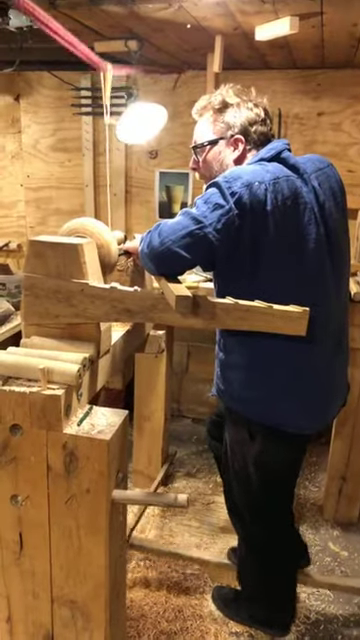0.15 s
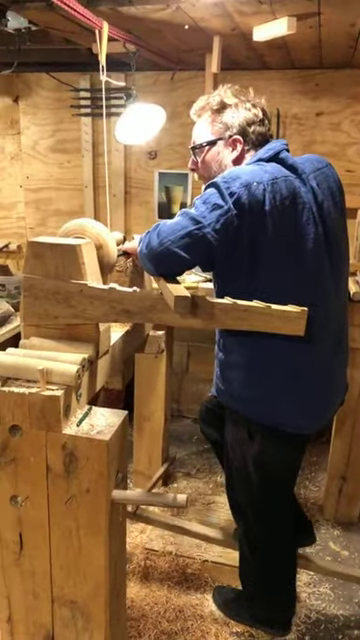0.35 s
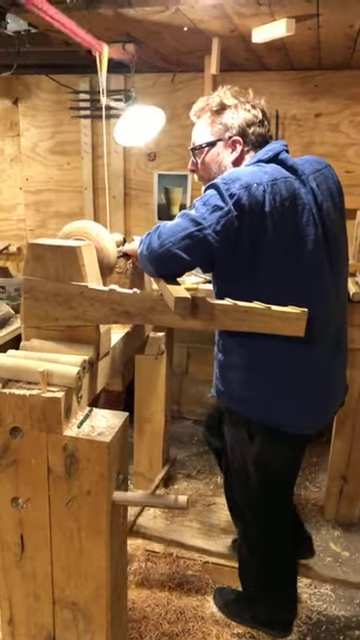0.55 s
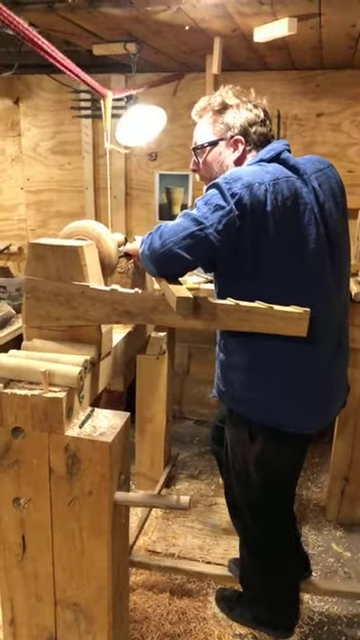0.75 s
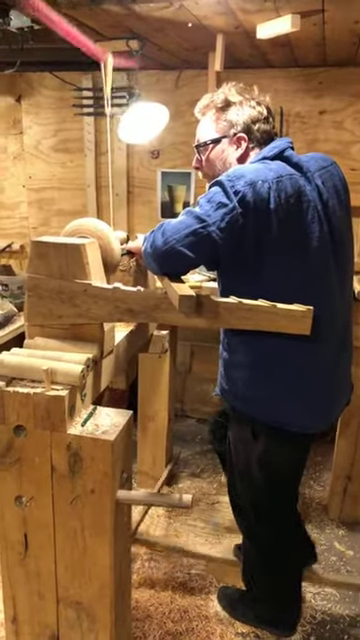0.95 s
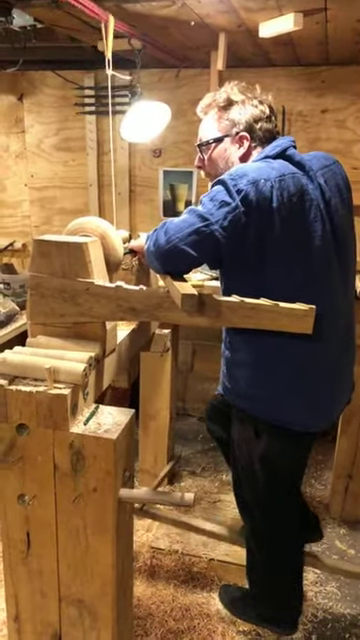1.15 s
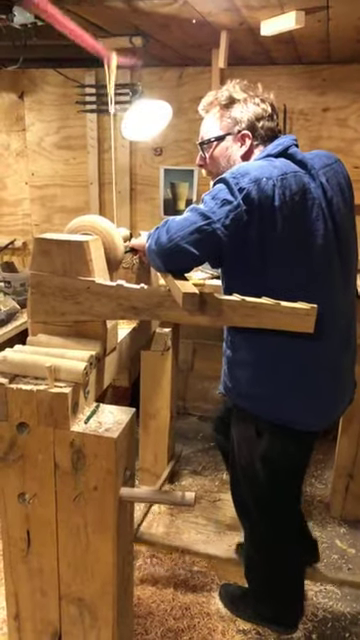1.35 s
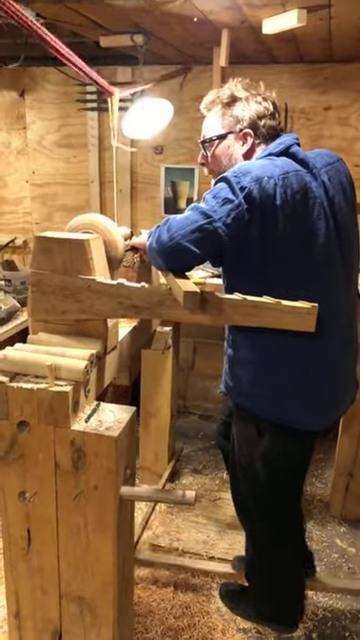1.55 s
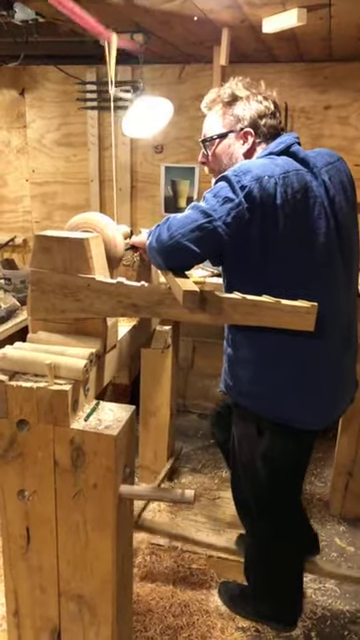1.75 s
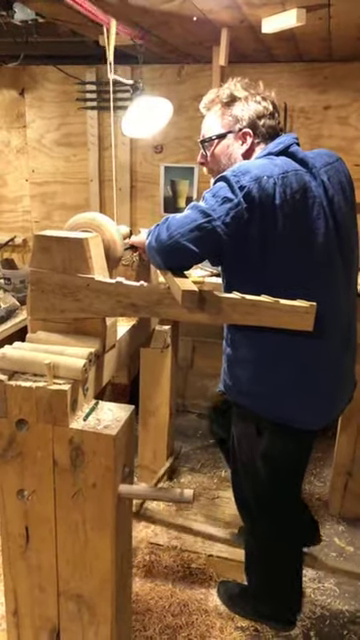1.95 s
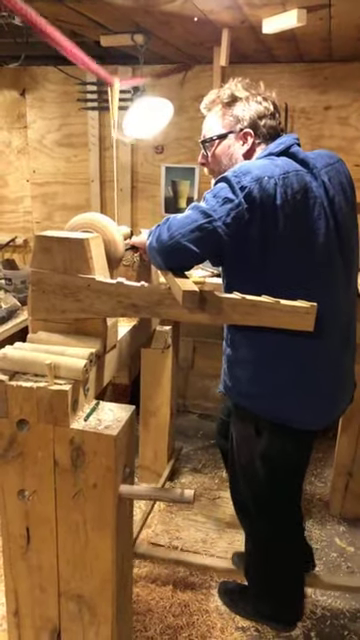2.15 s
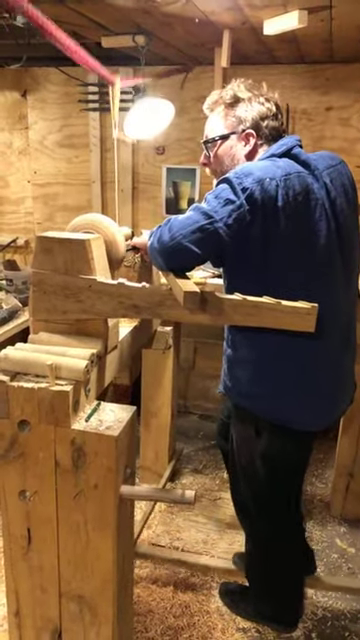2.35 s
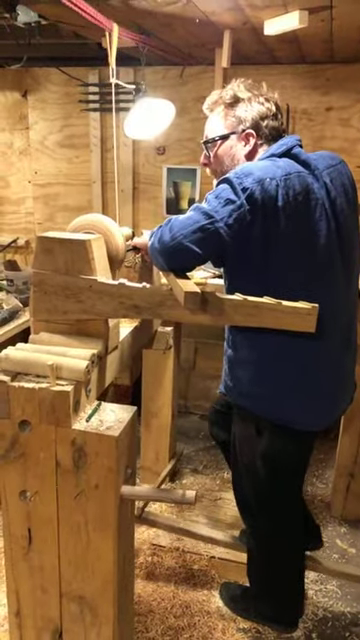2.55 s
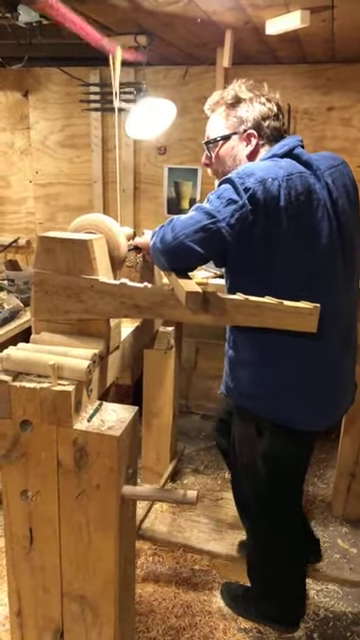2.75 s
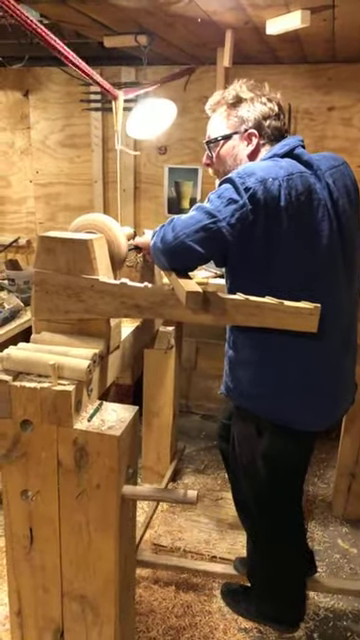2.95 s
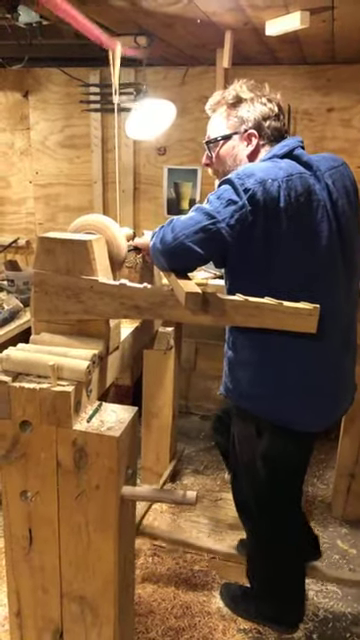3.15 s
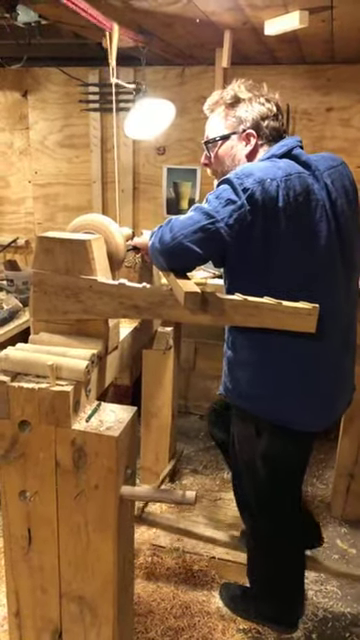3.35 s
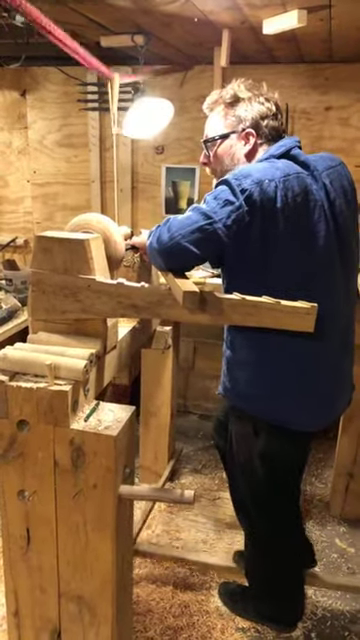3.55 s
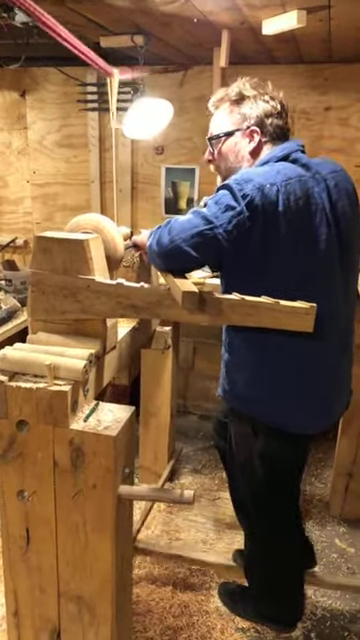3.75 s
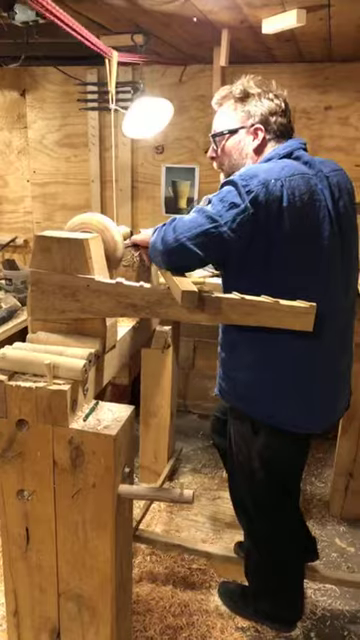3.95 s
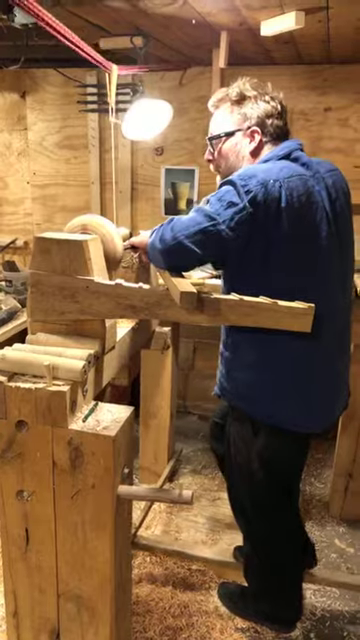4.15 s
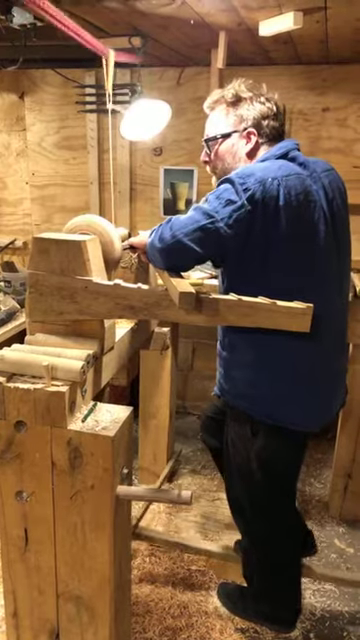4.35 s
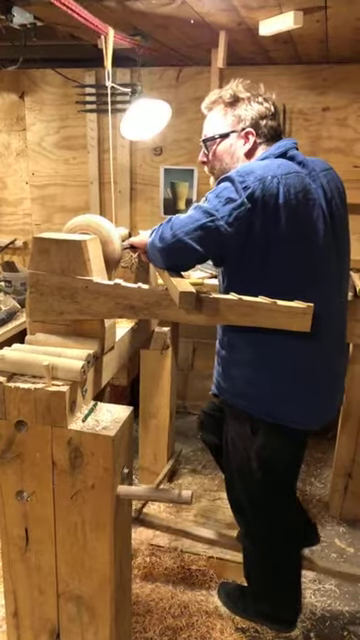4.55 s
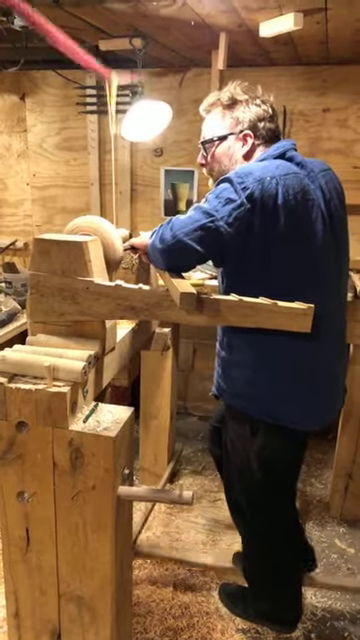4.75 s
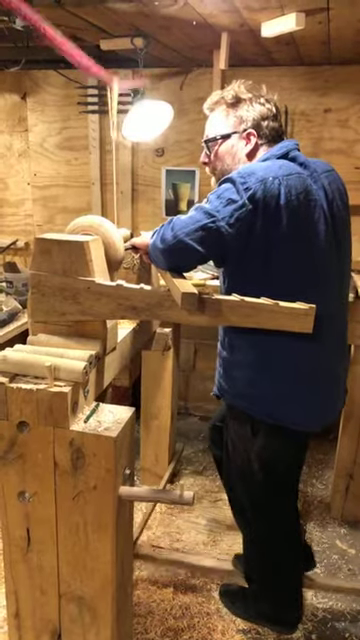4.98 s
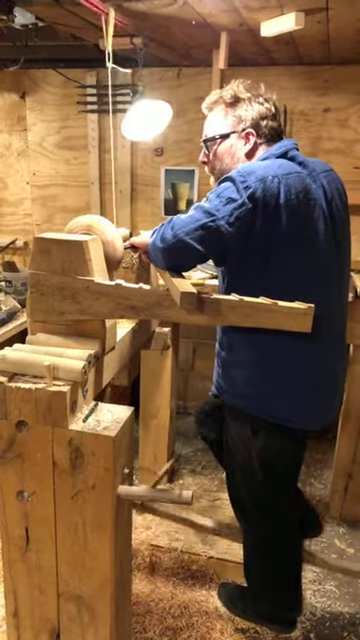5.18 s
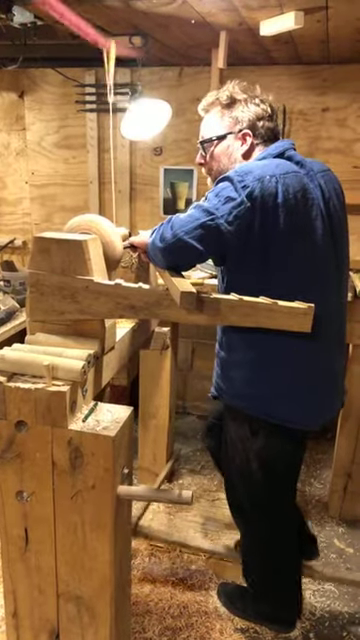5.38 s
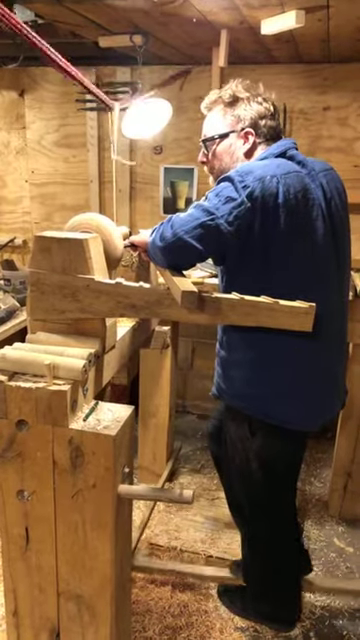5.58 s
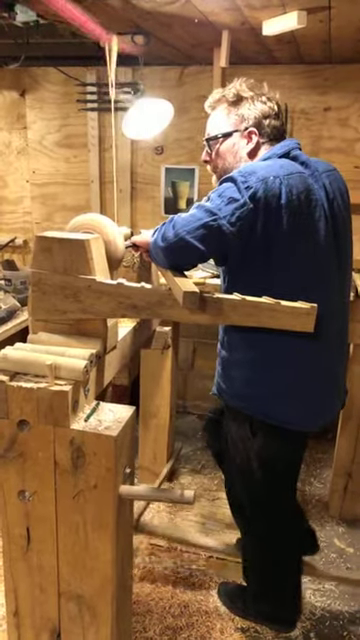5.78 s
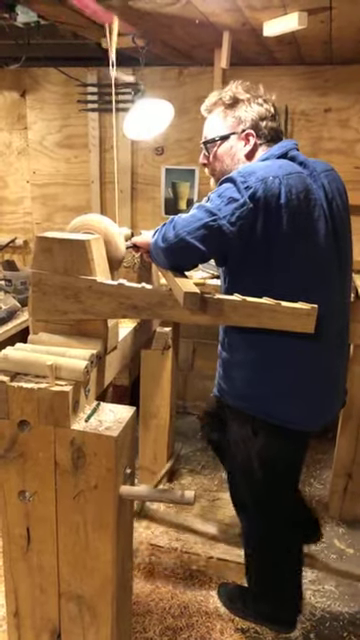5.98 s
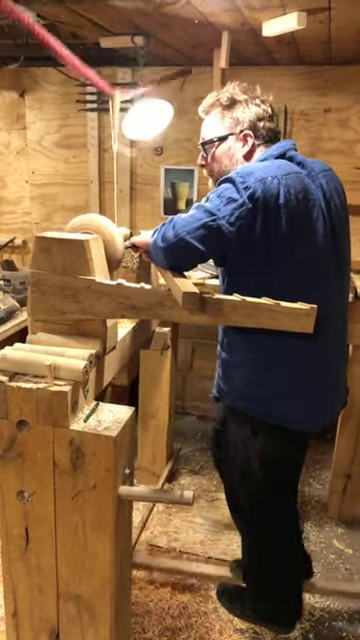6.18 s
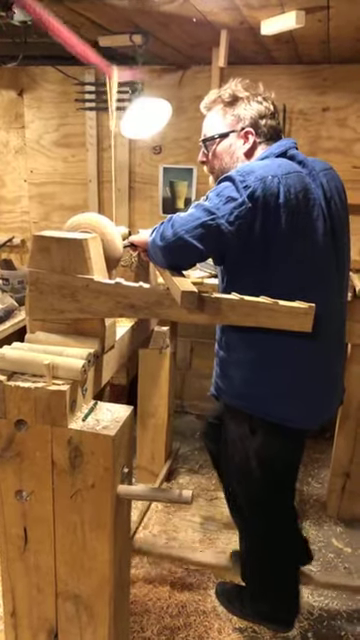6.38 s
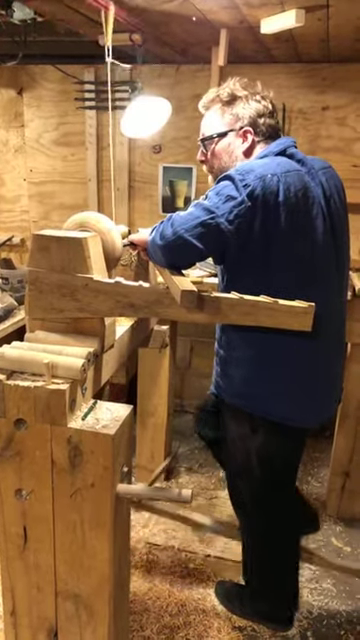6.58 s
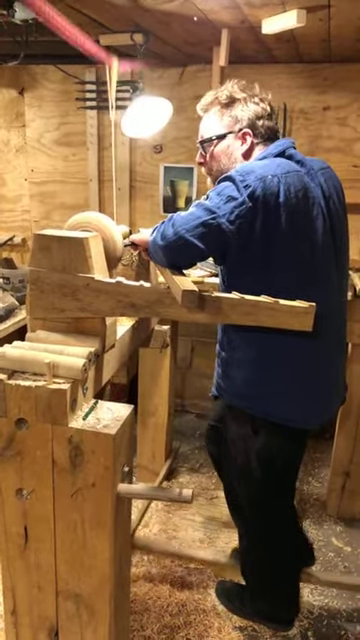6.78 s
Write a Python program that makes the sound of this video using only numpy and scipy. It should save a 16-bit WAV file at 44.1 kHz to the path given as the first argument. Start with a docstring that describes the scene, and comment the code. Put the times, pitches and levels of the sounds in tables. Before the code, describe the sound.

Close in a quiet wooden workshop, a hook tool shaves a bowl on a foot-powered lathe. A few light rubs open the scene, then a small dry snap at 0.4 s leads into the first gritty scrape around 0.5-0.75. Similar strokes follow near 1.3, 2.0, 2.7 and 3.4 s: dense, crackly tearing of fibres with hollow woody body, midrange rasp and airy hiss, each swelling into two quick pulses and cutting off abruptly. Soft brushing rubs precede several. From 3.7 to 4.5 s there is a longer lull with only faint rubs, then cutting resumes at 4.6, stronger at 5.3, 6.0 and 6.65 s. Brief squeaky catches stand out at 5.2 and about 6.55 s. Between strokes, faint cord hiss, dull low treadle rocking and very quiet room air; the short boxy echo fades quickly.

```python
"""In a plank-lined workshop a hook tool shaves a wooden bowl on a foot-driven pole lathe.
Each treadle stroke spins the bowl into the edge: fibres tear in a dense stream of random breaks that excite
resonances of frame, bowl and tool; between cuts come light rubs, some leading into a cut, and the cord hisses.
A dry snap and a few short squeaks of the edge stand out. Filtered noise makes the faint room air and the
treadle's rocking, and feedback delays make the echo."""
import sys
import numpy as np
from scipy import signal
from scipy.fft import rfft, irfft, next_fast_len
from scipy.io import wavfile

SR = 44100
rng = np.random.default_rng(int(sys.argv[2]) if len(sys.argv) > 2 else 0)


def decibels_to_gain(level_db):
    """Convert a level in decibels to a linear amplitude gain (20 dB per decade)."""
    exponent = np.asarray(level_db, float) / 20
    return 10 ** exponent


def transcribe(signal):
    """Save signal, clipped to [-1, 1], as a 16-bit WAV file at the path in sys.argv[1]."""
    frames = np.atleast_2d(signal).T
    limited = np.clip(frames, -1, 1)
    pcm = np.round(limited * 32767).astype(np.int16)
    wavfile.write(sys.argv[1], SR, pcm)


N = 300762
TIME = np.arange(N) / SR   # [s]
COARSE_TIME = np.arange(0, N / SR + .002, .002)   # for slow level curves [s]

# Travel of the edge across the bowl: (time [s], share of the way [0-1])
EDGE_TRAVEL = [(0, 0), (3.6, 0), (4.6, 0.51), (6.82, 0.98)]
# Resonances of the timber frame, the bowl, the steel tool and the shaving:
# (frequency [Hz], bandwidth [Hz], relative drive at start of travel [dB], at its end [dB])
FRAME_MODES = [(145.6, 16, -8, -7), (191, 55, -14.5, -33), (226, 26.5, 1, -1), (257, 133, -6, -6.5)]
BOWL_MODES = [(339, 18, -5, -8), (373, 18, -3, -6), (420, 30, -10, -10), (509, 20, -4, -5),
              (595, 30, -3, -6), (645, 25, -2.5, -0.5), (668, 25, -4, -3), (755, 24, -3, 0.5)]
TOOL_MODES = [(1090, 70, -11, -9), (1250, 50, -12, -5), (1352, 20, -3, -5), (1390, 25, 2.5, -4),
              (1490, 50, -9, -6), (1640, 30, -5, -5), (1722, 28, -9, -3), (1805, 25, -8, -2.5),
              (1843, 22, -7, -1.5), (2034, 40, -4, -6), (2115, 25, -8, -7), (2310, 100, -10, -7),
              (2610, 50, -5, -4), (3025, 45, -9, -5), (3110, 35, -9, -9), (3310, 60, -13, -10),
              (3770, 70, -13, -14), (3950, 100, -22, -19)]
SHAVING_MODES = [(4700, 100, -16, -14), (4960, 120, -11, -14), (5380, 250, -16, -17), (6640, 150, -19, -18),
                 (7700, 250, -26, -24), (8500, 150, -23, -21), (9050, 250, -22, -22), (9500, 100, -24, -23),
                 (10900, 200, -29, -26), (11800, 300, -24, -25), (12700, 300, -27, -26),
                 (14900, 300, -34, -34)]
# Broad sound of tearing between the modes: (frequency [Hz], relative density [dB per Hz])
TEARING_SPECTRUM = [(59, -56), (100, -69), (373, 0.5), (461, 0), (662, -5), (991, -8.5), (1390, -0.5),
                    (1800, -0.5), (2370, -4.5), (3050, -6), (4290, -21.5), (4870, -25.5), (7140, -34),
                    (12100, -31.5), (16000, -48)]
# Catches of the edge in the wood: (time [s], drive level [dB], fade time [s], extra drive of high partials [dB])
BITES = [(5.183, -27.5, 0.039, -11), (6.54, -43.5, 0.044, -9), (6.57, -23, 0.026, -1.5)]
# Partials of the edge's short squeaks, near multiples of 1.49 kHz:
# (frequency [Hz], relative level [dB], T60 [s])
SQUEAK_PARTIALS = [(1050, -7, .1), (1500, 1.5, .14), (2300, -8, .08), (2900, -0.5, .1), (4430, 1, .11),
                   (4800, -3, .03), (5920, -6, .05), (7440, -10, .06), (8414, -10, .06), (10500, -18, .06),
                   (11750, -18, .06)]
# One dry snap: (time [s], relative drive level [dB], frequency of its main hump [Hz])
SNAPS = [(0.3961, -21, 2750)]
# Air of the quiet workshop: (frequency [Hz], relative density [dB per Hz])
AIR_SPECTRUM = [(15, -47), (25, 3), (43, -9.5), (64, -5.5), (108, -22.5), (157, -62), (249, -50),
                (503, -58), (863, -24), (1290, -23), (1890, -31.5), (12500, -46.5), (16000, -59)]
# Decay of the echo: (frequency [Hz], T60 [s])
ROOM_T60 = [(100, 0.2), (500, 0.47), (2000, 0.15), (8000, 0.057), (16000, 0.024)]
# Runs of the cord with the edge off the wood: (middle [s], level [dB])
CORD_RUNS = [(.9, -78), (1.7, -72), (2.38, -71.5), (3.1, -75), (3.8, -77), (4.2, -82), (5.08, -64.5),
             (5.77, -65.5), (6.44, -67)]
# Cutting strokes, meeting end grain twice a turn: (touch [s], delay to first end grain [s], half turn [s],
# depth at touch [dB], at first end grain [dB], at second [dB], frame offset [dB], bowl offset [dB])
CUTS = [(.455, .12, 0.14, -49, -37, -35.5, -3.2, 2.3), (1.219, 0.13, 0.089, -49.5, -34, -31.5, -5.5, 0.68),
        (1.94, 0.14, 0.1, -54, -33.5, -32.5, -1.5, 0.45),
        (2.668, 0.087, 0.11, -49.5, -35.5, -31.5, 0, -0.24),
        (3.359, 0.098, .095, -51.5, -34.5, -31.5, -3.5, -0.56),
        (4.591, .12, 0.09, -49.5, -32, -30.5, -5, 0.0015), (5.27, 0.14, 0.082, -37.5, -31, -30, -1, 1.3),
        (5.94, .16, 0.079, -49.5, -29, -28, 1, 0.95), (6.64, 0.058, 0.094, -42, -33, -27, -2.5, 0.38)]
# Light rubs, some leading into a cut:
# (touch [s], rise [s], hold [s], level [dB], bowl offset [dB], hiss offset [dB])
RUBS = [(-.05, 0.02, 0.013, -44.5, 5.5, -17), (0.072, 0.028, 0.022, -53, 2.5, -9),
        (0.183, 0.019, 0.15, -52, 3, -9.5), (0.967, 0.017, 0.068, -55, -2, -8.5),
        (1.028, 0.0072, 0.046, -48.5, 3, -10), (1.798, 0.042, .03, -52, 3.5, -11),
        (2.464, 0.063, 0.014, -45, -1, -9.5), (3.12, 0.0073, .02, -58.5, 2.5, -5.5),
        (3.185, 0.03, 0.01, -43, 1.5, -11), (3.76, .04, 0.057, -68, -1.5, -11),
        (3.913, 0.015, 0.061, -68.5, -0.5, -16), (4.164, .003, 0.011, -67, -4, -17),
        (4.228, 0.038, .09, -57, 1.5, -15), (4.342, 0.082, 0.048, -45, 2, -13.5),
        (5.003, 0.059, .09, -66, -4, -12), (5.162, 0.03, 0.017, -44.5, -2, -6.5),
        (5.72, .03, 0.048, -71.5, 0, -12), (5.888, 0.018, 0.019, -59, 2.5, -7),
        (6.532, .025, .015, -51, -8, -18), (6.566, 0.012, 0.012, -43.5, -7, 1.5)]
# Answer of each part to a cut: (level at the usual depth [dB], share of the depth's swing [ratio],
# hold after second end grain at the usual depth [s], fall [dB/s], dip between end grains [dB])
CUT_LAW = {"frame": (-53.5, 1, 0.13, 124, -5), "bowl": (-38, .5, -0.02, 120.5, 2.7),
           "tool": (-32.5, 1, -0.0478, 171.5, 5), "hiss": (-41.5, 1.5, -0.0349, 235, 4)}
# Answer of each part to a rub: (start below its top [dB], lateness of its top [s], fall [dB/s])
RUB_LAW = {"bowl": (11.3, 0.0041, 137), "tool": (13.3, 0.00088, 152), "hiss": (10.7, .001, 196)}
# Rocking of the treadle on the floor: (middle [s], rocking level [dB], frame level [dB])
ROCKS = [(.01, -65, -47.5), (.37, -54, -55), (.52, -66, -51.5), (1.11, -58, -50), (1.33, -61, -54.5),
         (1.52, -60, -63), (1.9, -58, -56), (2.15, -69, -63), (2.6, -53, -49.5), (2.98, -53, -60),
         (3.29, -60, -56.5), (3.6, -64, -55), (4.28, -70, -64), (4.45, -59, -51.5), (4.8, -57, -56),
         (5.22, -69, -57), (5.45, -58, -48), (6.0, -62, -73), (6.22, -61, -56), (6.72, -57, -61)]

BREAKS_PER_S = 6000
COUPLING_SPREAD_DB = 1.6   # wander of each mode's drive
AIR_DB, TREADLE_REST_DB = -63.5, -66
ROCK_S, CORD_RUN_S = 0.048, 0.082   # standard deviations of the bell-shaped swells
USUAL_CUT_DB = -33
SWELL_POWER = 1.96   # above 1: a cut swells fast at first, then levels off
TOUCH_S = 0.02   # fade-in of a cut, complete at its touch
RUB_TOUCH_SHARE = 0.45   # fade-in of a rub, as a share of its rise
EARLY_TURN_RATIO = 1.16   # slower turning before the first end grain: the bowl is still gaining speed
HOLD_S_PER_DB = -0.0131   # a stronger second end grain shortens the hold


def rms_one(x):
    """Normalisation of signal power: scales to unit rms."""
    return x / np.sqrt(np.mean(x ** 2) + 1e-20)


def in_time(rows):
    """Linear interpolation in time: each column of a table becomes a curve."""
    times, *columns = np.transpose(rows)
    return [np.interp(TIME, times, column) for column in columns]


def at_hz(points, hz):
    """Logarithmic pitch scale: interpolates a spectrum along log frequency."""
    table_hz, values = np.transpose(points)
    return np.interp(np.log(hz + 1), np.log(table_hz), values)


def coloured(x, spectrum):
    """Linear filtering: the spectrum is multiplied by a gain curve."""
    size = next_fast_len(N)
    hz = np.fft.rfftfreq(size, 1 / SR)
    return irfft(rfft(x, size) * decibels_to_gain(at_hz(spectrum, hz)), size)[:N]


def band(x, low_hz, high_hz):
    """Band limitation by a steep Butterworth filter."""
    sos = signal.butter(4, [low_hz, high_hz], "band", fs=SR, output="sos")
    return signal.sosfilt(sos, x)


def resonate(x, hz, width_hz):
    """Resonance of a damped oscillator: a pole pair with unit gain at its peak."""
    r = np.exp(-np.pi * width_hz / SR)
    feedback = [1, -2 * r * np.cos(2 * np.pi * hz / SR), r * r]
    return signal.lfilter([(1 - r * r) / 2, 0, (r * r - 1) / 2], feedback, x)


def drift(rate_hz):
    """Random fluctuation: noise through two equal low-pass poles, with unit rms."""
    hop = 40   # samples between slow values
    r = np.exp(-2 * np.pi * rate_hz * hop / SR)
    noise = rng.standard_normal(N // hop + 2002)
    slow = signal.lfilter([1], [1, -2 * r, r * r], noise)[2000:]   # without the settling
    return np.interp(np.arange(N) / hop, np.arange(len(slow)), rms_one(slow))


def swells(rows, width_s):
    """Superposition of Gaussian envelopes from (middle [s], level [dB]) rows, as gain."""
    gain = sum(decibels_to_gain(db) * np.exp(-((COARSE_TIME - middle) / width_s) ** 2 / 2) for middle, db in rows)
    return np.interp(TIME, COARSE_TIME, gain)


def sudden(start, fade_s, rise_s):
    """Exponential relaxation: a quick rise, then a fade."""
    since = np.maximum(TIME - start, 0)
    return (1 - np.exp(-since / rise_s)) * np.exp(-since / max(fade_s, .004))


def room_air():
    """Stationary random noise: the steady air of the room."""
    return decibels_to_gain(AIR_DB) * rms_one(coloured(rng.standard_normal(N), AIR_SPECTRUM))


def treadle_rocking():
    """Noise-driven resonance: a low hump under a broader band swells as the treadle rocks."""
    broad = band(rng.standard_normal(N), 99, 197)
    hump = decibels_to_gain(10) * resonate(rng.standard_normal(N), 74, 31)
    gain = decibels_to_gain(TREADLE_REST_DB) + swells(np.array(ROCKS)[:, :2], ROCK_S)
    return gain * rms_one(broad + hump)


def rub_power(part):
    """Addition of incoherent powers: all rubs as heard through one part."""
    t, total = COARSE_TIME, np.zeros(len(COARSE_TIME))
    if part not in RUB_LAW:
        return total
    start_below_db, late, fall = RUB_LAW[part]
    for touch, rise, hold, rub_db, bowl_db, hiss_db in RUBS:
        top = touch + rise + late
        db = rub_db + {"bowl": bowl_db, "hiss": hiss_db}.get(part, 0)
        db = db - start_below_db * np.clip((top - t) / max(top - touch, .002), 0, 1)
        db = db - fall * np.maximum(t - top - hold, 0)
        fade_in = np.clip((t - touch) / max(RUB_TOUCH_SHARE * rise, .002) + 1, 0, 1)
        total += (decibels_to_gain(db) * fade_in) ** 2
    return total


def cut_power(part):
    """Periodic modulation by the grain: each cut swells, dips between end grains and decays."""
    t, total = COARSE_TIME, np.zeros(len(COARSE_TIME))
    usual_db, share, usual_hold, fall, dip_db = CUT_LAW[part]
    for touch, rise, half, touch_db, first_db, second_db, frame_db, bowl_db in CUTS:
        first = touch + rise
        second = first + half
        depth = np.interp(t, [first, second], [first_db, second_db])
        depth -= (first_db - touch_db) * np.clip((first - t) / rise, 0, 1) ** SWELL_POWER
        half_turn = np.where(t < first, EARLY_TURN_RATIO * half, half)
        # a negative dip raises the level between end grains
        dip = dip_db * np.sin(np.pi * (np.minimum(t, second) - first) / half_turn) ** 2
        hold = max(usual_hold + HOLD_S_PER_DB * (second_db - USUAL_CUT_DB), 0)
        db = usual_db + share * (depth - USUAL_CUT_DB) - dip
        db -= fall * np.maximum(t - second - hold, 0)
        db += {"frame": frame_db, "bowl": bowl_db}.get(part, 0)
        total += (decibels_to_gain(db) * np.clip((t - touch) / TOUCH_S + 1, 0, 1)) ** 2
    return total


def effort(part):
    """Energy summation: level in dB of one part through all cuts and rubs."""
    power = 1e-10 + cut_power(part) + rub_power(part)
    return np.interp(TIME, COARSE_TIME, 10 * np.log10(power))


def breaks(spread_db, swell):
    """Random impulse process: fibres break with uneven sizes, more strongly where the grain swells."""
    sizes = decibels_to_gain(spread_db * np.minimum(rng.exponential(1, N), 5)) * rng.choice([-1, 1], N)
    born = rng.random(N) < BREAKS_PER_S / SR
    return rms_one(sizes * born * swell)


def ringing(tearing, modes, level_db, edges_hz, broad_db):
    """Modal superposition: breaks drive modes whose coupling shifts with the edge; others sound broad."""
    travel = np.clip(in_time(EDGE_TRAVEL)[0], 0, 1)
    rung = np.zeros(N)
    for k, (hz, width, start_db, end_db) in enumerate(modes):
        drive_db = start_db + travel * (end_db - start_db) + COUPLING_SPREAD_DB * drift(6.7)
        rung += (-1) ** k * resonate(tearing[0] * decibels_to_gain(drive_db), hz, width)
    broad = band(coloured(tearing[1], TEARING_SPECTRUM), *edges_hz)
    return decibels_to_gain(level_db) * rms_one(rms_one(rung) + decibels_to_gain(broad_db) * rms_one(broad))


def fine_grain(x, share_db, t60):
    """High modal density: countless lesser timber modes act as a short decaying noise response."""
    t = np.arange(SR // 2) / SR
    lesser = rng.standard_normal(len(t)) * decibels_to_gain(-60 * t / t60)
    lesser *= decibels_to_gain(share_db) / np.sqrt(np.sum(lesser ** 2))
    lesser = signal.sosfilt(signal.butter(2, 1500, "high", fs=SR, output="sos"), lesser)
    return x + signal.fftconvolve(x, lesser)[:N]


def cutting():
    """Common excitation: breaks on one swelling grain sound through frame, bowl, steel and shaving."""
    swell = decibels_to_gain(drift(18))
    pair = breaks(2.8, swell), breaks(2.86, swell)
    crossed = pair[::-1]   # neighbouring bands exchange the ringing and the broad stream
    # the rocking treadle shakes the frame too
    frame_gain = decibels_to_gain(effort("frame")) + swells(np.array(ROCKS)[:, ::2], ROCK_S)
    frame = ringing(pair, FRAME_MODES, 20 * np.log10(frame_gain), (150, 300), broad_db=-13)
    bowl = ringing(crossed, BOWL_MODES, effort("bowl"), (290, 880), broad_db=-3)
    tool = ringing(pair, TOOL_MODES, effort("tool"), (900, 4300), broad_db=-3)
    shaving = ringing(crossed, SHAVING_MODES, effort("hiss"), (4300, 16200), broad_db=0)
    return fine_grain(frame + bowl + tool + shaving, share_db=-7, t60=.2)


def workshop(x):
    """Reverberation: ten feedback delays between the plank walls, dying faster in the treble."""
    size = next_fast_len(N + SR)
    hz = np.fft.rfftfreq(size, 1 / SR)
    t60, walls = at_hz(ROOM_T60, hz), 0
    for k, lag in enumerate(rng.uniform(.015, .045, 10)):   # [s]
        once = decibels_to_gain(-60 * lag / t60) * np.exp(-2j * np.pi * hz * lag)
        walls = walls + (-1) ** k * once / (1 - once)   # sum of all returns
    return irfft(rfft(x, size) * walls, size)[:N]


def snap():
    """Heavy damping: an impulse through two broad humps gives a click with no ring."""
    out = np.zeros(N)
    for start, drive_db, hz in SNAPS:
        click = np.zeros(N) + 1e-18
        click[round(start * SR)] = decibels_to_gain(drive_db + 16.5)
        main = resonate(resonate(click, hz, 3000), hz, 3000)
        upper = resonate(resonate(click, 8200, 3000), 8200, 3000)
        out += main - decibels_to_gain(-10) * upper
    return out


def cord():
    """Amplitude modulation of noise: a bright hiss swells with each run of the cord."""
    # (frequency [Hz], relative density [dB per Hz])
    spectrum = [(1500, 1), (4000, 1.5), (9000, -1.5), (13000, -4.5), (16000, -17)]
    hiss = coloured(rng.standard_normal(N), spectrum)
    return swells(CORD_RUNS, CORD_RUN_S) * rms_one(hiss)


def bites():
    """Resonant filtering of a transient: a dying scrape and its tick sound the partials of a short squeak."""
    low, high = np.full(N, 1e-18), np.full(N, 1e-18)
    noise = rng.standard_normal((2, N))
    for start, drive_db, fade, bright_db in BITES:
        scrape = decibels_to_gain(drive_db) * sudden(start, fade, 0.00073) * noise
        scrape[:, round((start + .002) * SR)] += decibels_to_gain(drive_db + 13.5)   # the tick
        low = low + scrape
        high = high + decibels_to_gain(bright_db) * scrape
    out = np.zeros(N)
    for k, (hz, level_db, t60) in enumerate(SQUEAK_PARTIALS):
        drive = low if k < 4 else high
        width_hz = np.log(1000) / np.pi / t60
        out += decibels_to_gain(level_db + 13) * resonate(drive[k % 2], hz, width_hz)
    # the scrape itself
    return out + decibels_to_gain(-6) * band(low[0], 600, 4800) + decibels_to_gain(-17.5) * band(high[1], 2700, 13600)


def scene():
    """Superposition of direct and reverberant sound: the lathe, its echo, a snap and the room beneath."""
    lathe = cutting() + bites() + cord()
    mix = lathe + decibels_to_gain(-11) * workshop(lathe) + snap() + room_air() + treadle_rocking()
    return mix[None]


def low_pass(x):
    """Removes everything above the highest recorded frequency."""
    return signal.sosfilt(signal.butter(12, 16470, fs=SR, output="sos"), x)


def record(dry):
    """High-pass response of a small microphone: little deep bass."""
    mix = signal.sosfilt(signal.butter(3, 38, "high", fs=SR, output="sos"), dry)
    return low_pass(mix)


dry = scene()
out = record(dry)
transcribe(out)
```